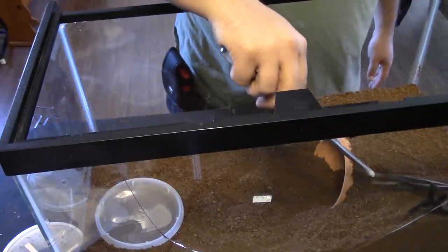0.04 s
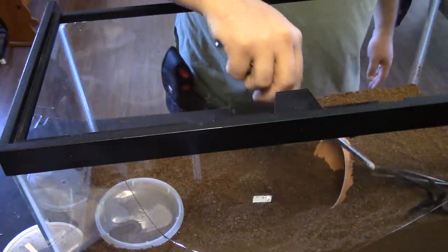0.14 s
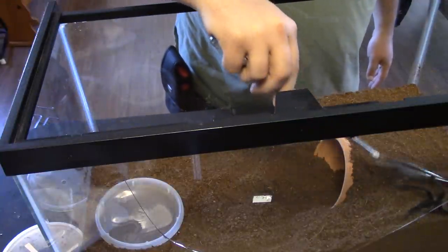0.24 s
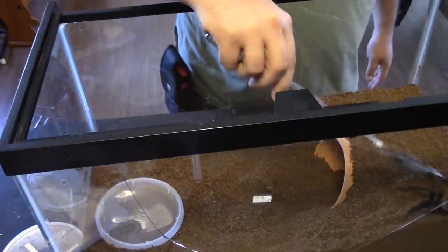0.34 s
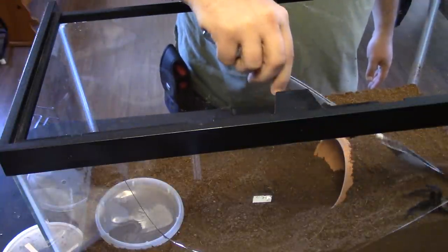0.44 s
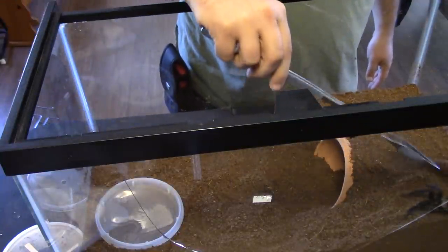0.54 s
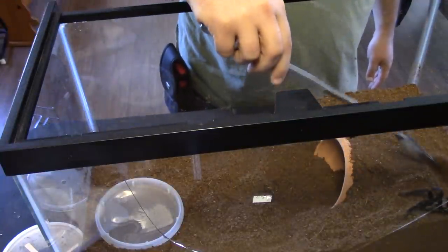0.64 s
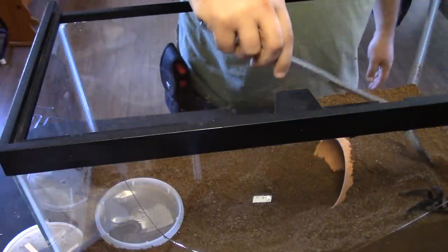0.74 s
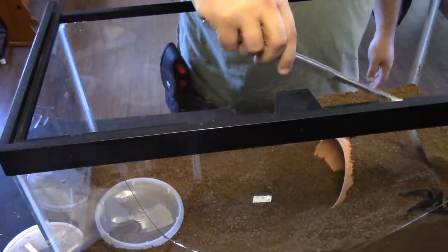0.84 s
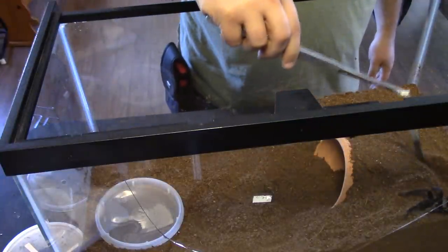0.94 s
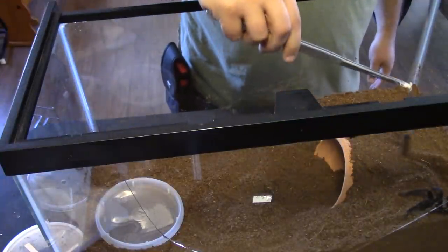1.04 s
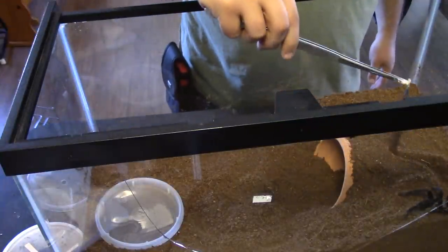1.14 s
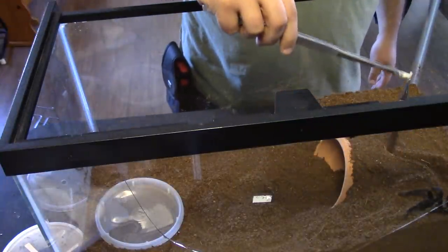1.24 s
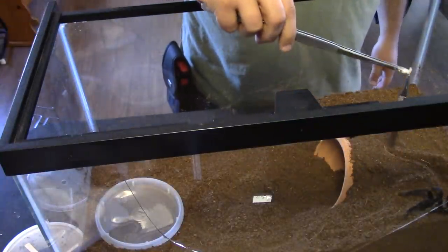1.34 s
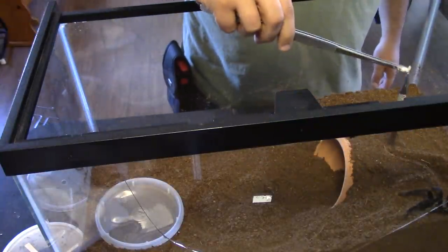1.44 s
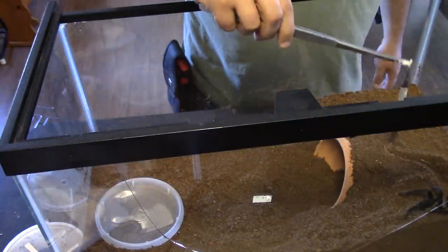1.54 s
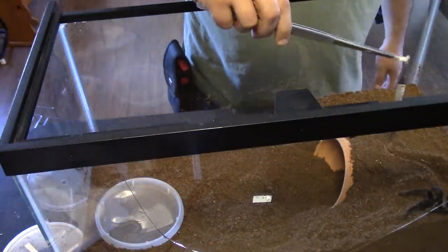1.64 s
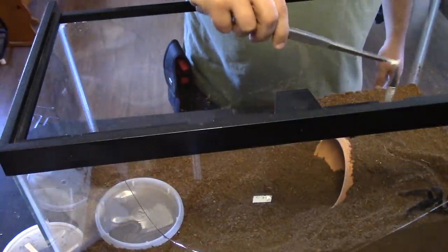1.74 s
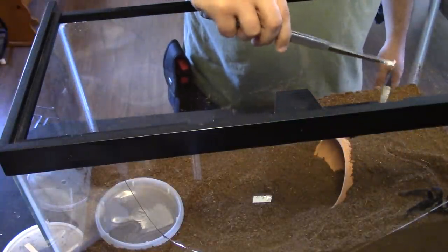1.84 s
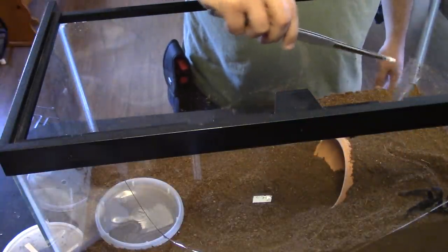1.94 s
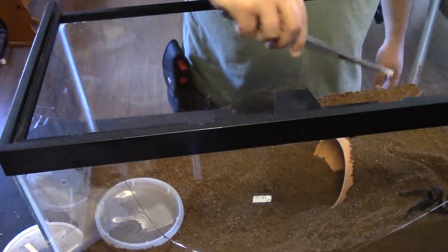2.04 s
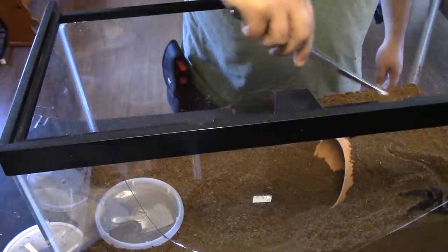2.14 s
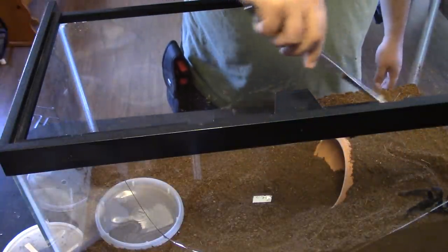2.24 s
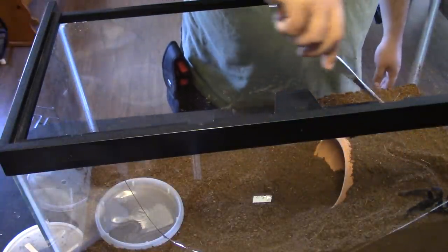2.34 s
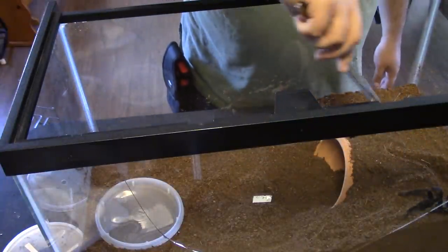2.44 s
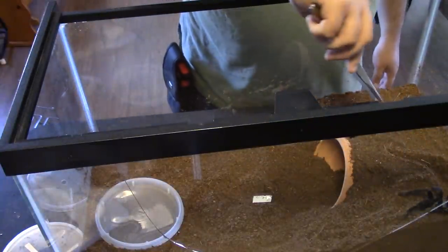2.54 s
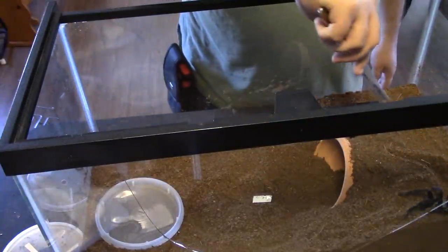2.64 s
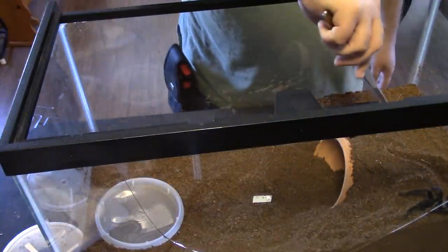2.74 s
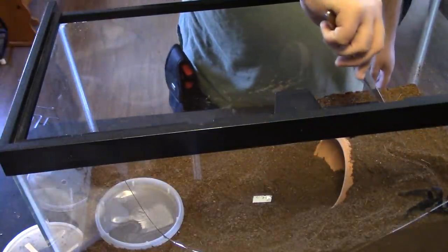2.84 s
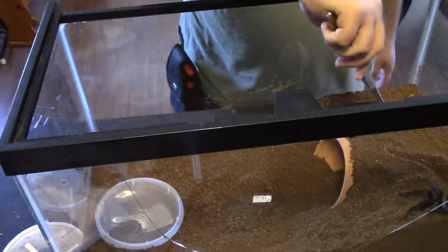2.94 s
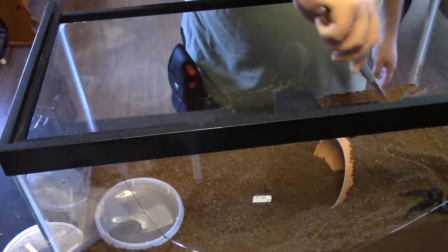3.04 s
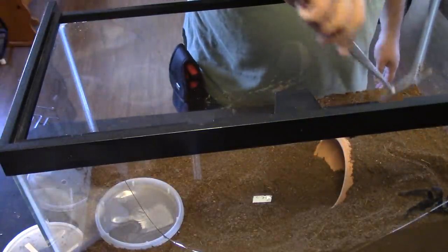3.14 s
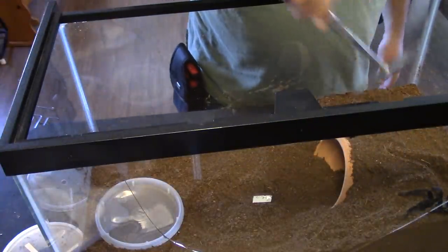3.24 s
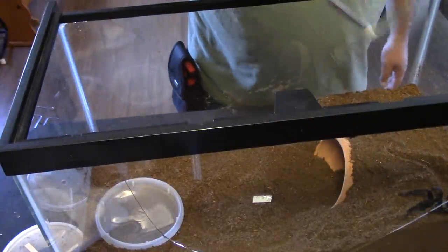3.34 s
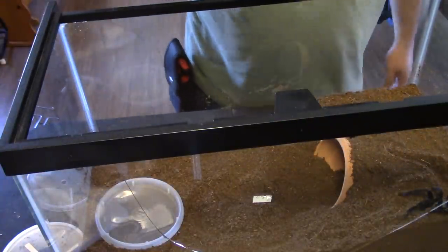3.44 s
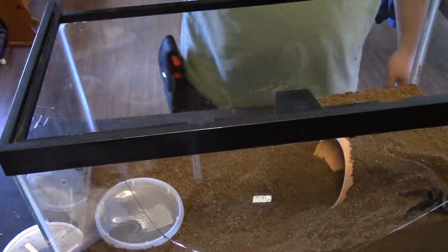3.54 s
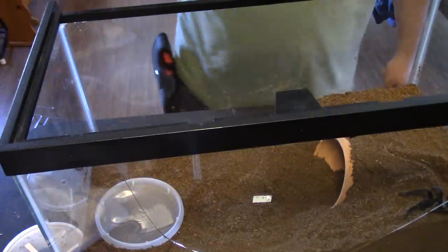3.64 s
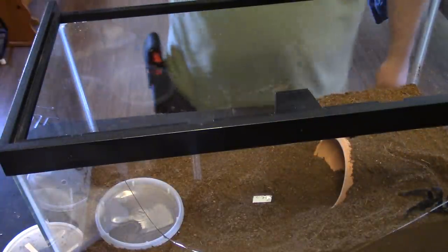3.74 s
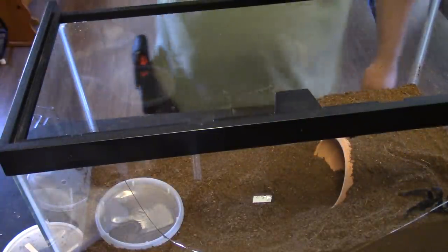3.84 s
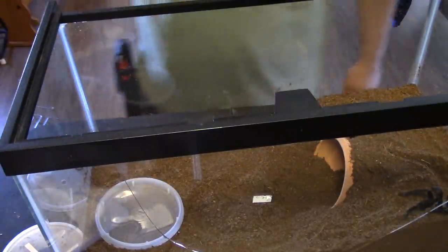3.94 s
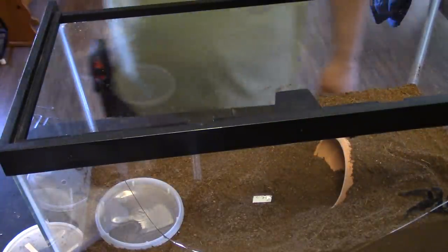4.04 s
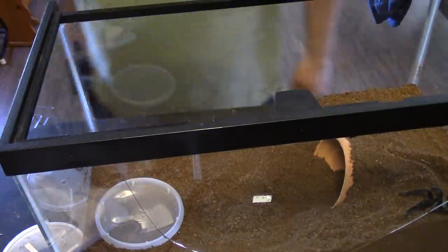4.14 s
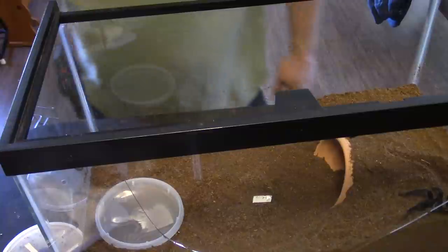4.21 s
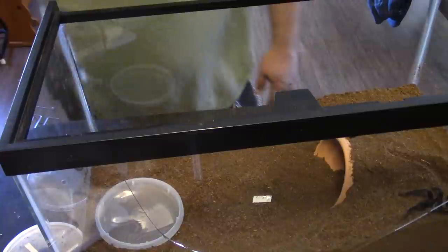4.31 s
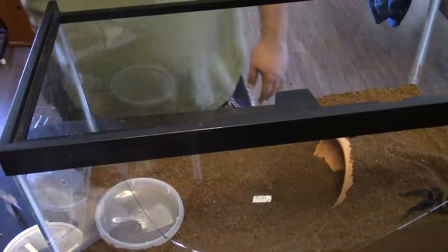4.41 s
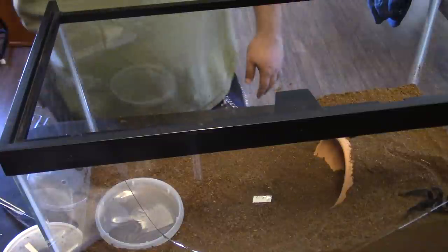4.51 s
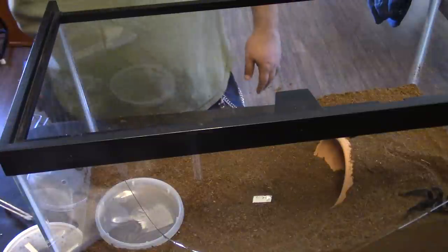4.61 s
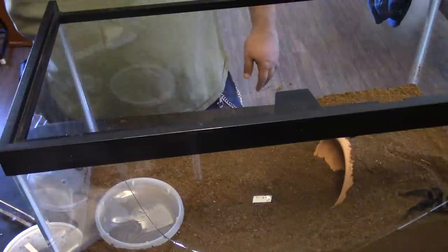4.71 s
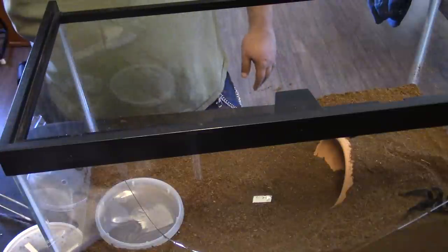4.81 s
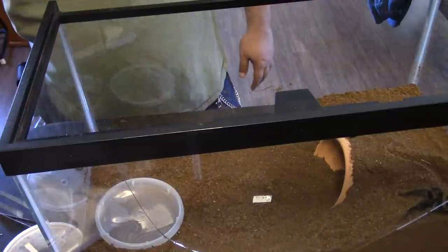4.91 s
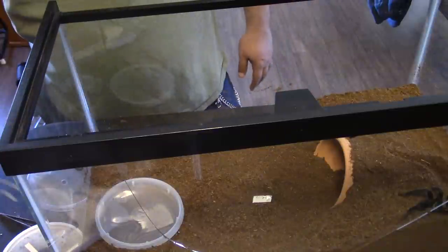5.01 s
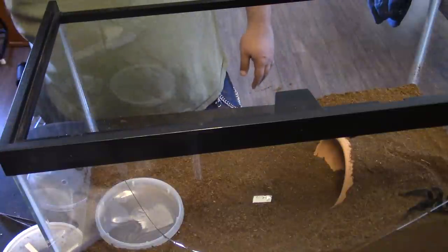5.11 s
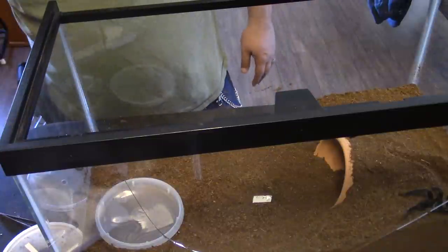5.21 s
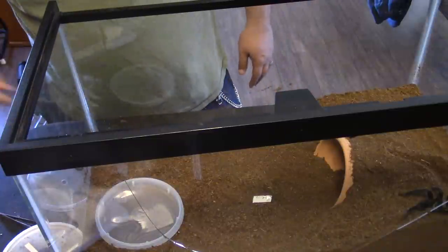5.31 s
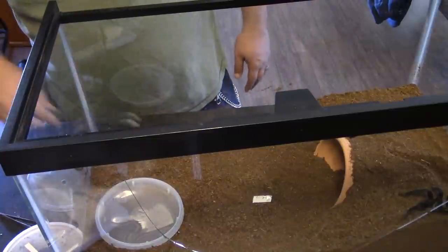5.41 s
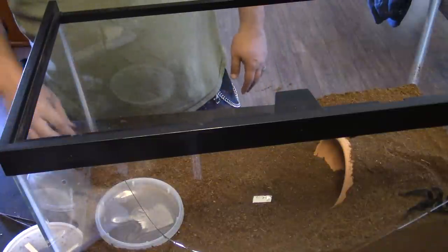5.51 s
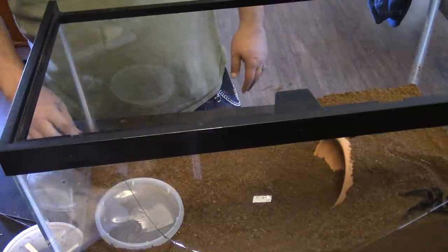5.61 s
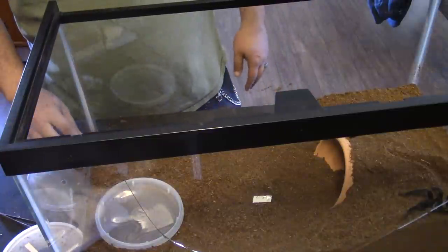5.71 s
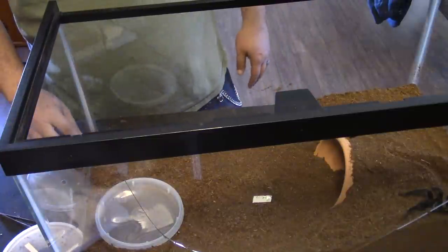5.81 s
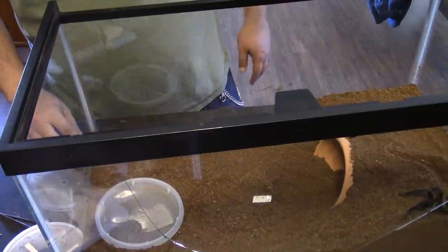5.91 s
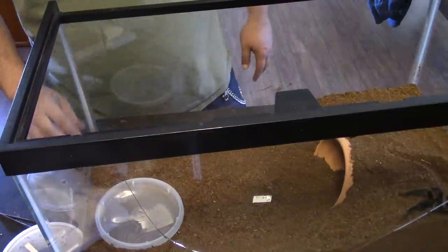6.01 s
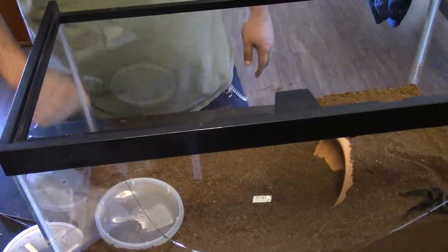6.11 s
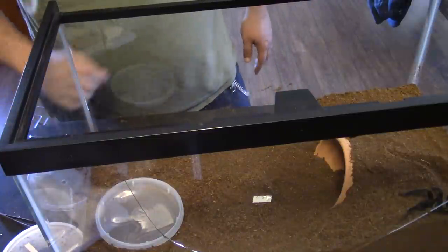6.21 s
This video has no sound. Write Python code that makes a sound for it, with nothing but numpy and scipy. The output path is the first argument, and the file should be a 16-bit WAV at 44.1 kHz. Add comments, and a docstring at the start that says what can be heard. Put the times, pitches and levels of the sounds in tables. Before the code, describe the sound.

Steel tongs snap open and knock loudly on a glass tank, then rattle, clatter on table and shelf, over low fan hiss and motor ticking.

```python
"""Small room: steel tongs are snapped, rattled, pinched, knocked and dragged on tank, frame, rim, table
and shelf; a second metal tool strikes a jar and is laid on a board. Blows excite the struck body's modes,
noise and a modal metal ring. Shaped noise makes fan, hiss, cloth and dragging;
a lens motor ticks, feet and small knocks are short decaying sines."""
import sys
import numpy as np
from scipy import signal
from scipy.fft import rfft, irfft
from scipy.io import wavfile
from scipy.ndimage import uniform_filter1d

SR = 44100
rng = np.random.default_rng(int(sys.argv[2]) if len(sys.argv) > 2 else 0)


def linear_from_db(decibels):
    """Turn decibels (scalar or array-like) into linear amplitude factors; 0 gives 1."""
    return 10 ** (np.asarray(decibels, float) / 20)


def transcribe(signal):
    """Save signal, clipped to [-1, 1], as a 16-bit WAV file at the path in sys.argv[1]."""
    frames = np.atleast_2d(signal).T
    limited = np.clip(frames, -1, 1)
    pcm = np.round(limited * 32767).astype(np.int16)
    wavfile.write(sys.argv[1], SR, pcm)


N = 276154

# fan and microphone hiss: f/Hz, relative density/dB
AIR_COLOUR = [(15, -67), (25, -34.5), (92, -17.5), (120, -7.5), (242, -9.5), (293, -9.5), (394, -6.5),
              (531, -9.5), (1700, -21), (1890, -20.5), (2160, -22.5), (10700, -36), (16000, -45)]
# hiss side signal: f/Hz, level re mid/dB
AIR_SIDE = [(60, -17), (180, -10), (550, -10), (1650, -7), (4970, -7.5), (15000, -10.5)]
# wavering fan tones: f/Hz, width/Hz, rms level/dB
FAN_TONES = [(119.6, 21, -67), (280, 9.2, -78.5), (335.5, 61, -72.5), (404, 5.9, -64.5)]
AIR_DB = -56.5

# lens motor hunts: start t/s, end t/s, initial tick level/dB
LENS_HUNTS = [(0, .33, -57.5), (.42, .77, -55), (1.02, 1.72, -55), (1.9, 2.92, -58.5), (3.15, 4.0, -57)]
LENS_FIRST_S, LENS_TICKS_PER_S = 0.022, 14.985
LENS_IDLE_DB, LENS_SETTLE_DB_PER_S = -61, 2.5

# contacts: t/s, relative blow level/dB at 400 Hz, at 2.5 kHz, at 10 kHz, relative metal ring level/dB
SNAP = [(1.874, -28.5, -22.5, -4.5, -46.5)]
ON_TANK = [(2.014, -10, -2, -21.5, -26.5)]
ON_FRAME = [(2.024, -5, -10.5, -31.5, -35.5)]
TIPS_MEET = [(2.568, -51.5, -38, -64.5, -66), (2.604, -52.5, -62, -55.5, -61),
             (2.612, -47, -49, -55, -50.5), (2.682, -43, -37, -25, -39.5), (2.694, -51, -26.5, -42.5, -36)]
TIPS_PINCH = [(2.817, -55, -43, -39.5, -41), (2.829, -47, -58, -38.5, -40), (2.857, -51, -61, -52, -53),
              (2.885, -48, -62, -45, -62)]
ON_RIM = [(3.009, -27.5, -48, -91, -78), (3.016, -19.5, -54, -65, -64), (3.044, -31.5, -31.5, -28.5, -75),
          (3.051, -25, -29, -32, -73)]
ON_TABLE = [(4.411, -12.5, -12.5, -20.5, -61), (4.426, -17, -51, -42, -80), (4.436, -51, -31.5, -37, -78),
            (4.443, -29, -45, -39.5, -86)]
ON_SHELF = [(4.644, -12.5, -22, -51, -90), (4.655, -25, -34, -42, -85), (4.704, -17.5, -28.5, -30.5, -47),
            (4.723, -19, -23.5, -65, -50), (4.782, -17, -25, -26.5, -41), (4.875, -10.5, -11.5, -27, -79),
            (4.884, -31, -29, -45, -74), (4.894, -20, -16, -32, -60), (4.904, -36, -22, -44, -76),
            (4.912, -36, -33, -41, -76)]
ON_JAR = [(5.521, -53, -53, -54, -82), (5.564, -21, -21, -27.5, -56), (5.753, -37, -43.5, -95.5, -74)]
LAID_DOWN = [(5.797, -16.5, -19.5, -54, -65), (5.813, -18.5, -29, -49, -74), (5.833, -17.5, -13, -40, -62),
             (5.844, -15, -12.5, -32.5, -61), (5.856, -15, -16.5, -42.5, -61), (5.861, -27, -19, -51, -40)]

# short resonances of struck bodies: f/Hz, width before damping/Hz, relative level/dB
HINGE = [(2180, 120, -22), (3140, 110, -13), (4225, 110, -17), (5440, 90, -9), (6790, 130, -12),
         (8215, 110, 2), (9295, 170, -6), (9750, 120, -2), (11500, 150, -11), (11900, 120, -16),
         (12715, 130, -4), (13600, 120, -17)]
TANK = [(185, 65, 5.5), (268, 36, 2), (580, 110, 3), (870, 180, 1), (1600, 300, 3), (2180, 260, -2.5),
        (3370, 240, -25), (4640, 150, -6), (5350, 390, -14.5), (6500, 170, -18), (8530, 230, -27.5),
        (10520, 170, -18), (12000, 157, -11.5), (15030, 150, -18.5)]
FRAME = [(568, 80, -3.5), (872, 80, -16), (1620, 300, 2), (2250, 250, -13.5), (3280, 250, -7.5),
         (3870, 200, -8), (5300, 300, -17.5)]
TIPS = [(3480, 280, -18), (5760, 270, -12.5), (7800, 250, -15), (8640, 200, -11), (9200, 190, -9.5),
        (10090, 300, -12.5), (10820, 190, -13.5), (12020, 150, -15.5), (12270, 200, -3.5),
        (13640, 270, -16), (14960, 240, -24)]
RIM = [(228, 19, 1), (946, 64, 7.5), (1825, 28, -12.5), (2540, 54, -13.5), (3375, 51, -12), (3900, 30, -25),
       (5180, 85, -6.5), (6100, 39, -14), (7500, 47, -13.5), (8180, 72, -10.5), (8850, 55, -15),
       (10780, 69, -16), (12700, 50, -10), (13300, 52, -24.5)]
TABLE = [(236, 21, -13.5), (720, 170, -5), (1435, 240, 0), (2450, 110, -10), (3000, 150, -2),
         (3770, 120, -15), (4600, 400, -5), (7750, 290, 1), (8250, 380, -3.5), (9600, 180, -10),
         (11400, 78, -28), (12900, 84, -27)]
SHELF = [(194, 130, -21), (486, 44, -23.5), (750, 180, -6.5), (920, 260, -13), (1650, 160, -2),
         (2440, 160, -5), (2640, 63, 3.5), (3100, 160, 0.5), (3650, 69, -1.5), (5880, 28, -14),
         (6530, 130, -10.5), (8770, 95, -17.5), (11260, 280, -26)]
JAR = [(196, 23, -13), (522, 96, 1.5), (976, 51, -11), (1470, 62, 6.5), (2000, 45, -31), (2725, 104, 2),
       (3200, 150, -5), (3990, 70, -0.5), (4860, 170, 1), (5220, 110, 2), (6350, 120, -2), (7400, 410, -11)]
BOARD = [(256, 33, -11), (453, 20, -12), (736, 75, -2), (1340, 185, 1), (2057, 70, -7), (2760, 71, -10),
         (3820, 210, -7.5), (4570, 510, -13), (6020, 170, -14), (6470, 250, -8), (8300, 92, -36)]

# tongs modes: f/Hz
TONGS_HZ = [2358, 2832, 3585, 3725, 3867, 4237, 4395, 5474, 5610, 6020, 6175, 6450, 6815, 7655, 7915, 8420,
            8600, 8930, 9230, 9722, 10160, 10320, 10900, 11710, 11850, 12080, 12660, 12840, 13360, 14880]
# tongs modes: t60 before the grip/s
TONGS_T60_S = [.5, 1.5, 0.2, .4, .25, 0.4, 1.0, 0.27, .2, .25, 0.35, .3, 0.3, 0.4, 0.24, 0.3, 0.25, 0.2, .2,
               0.25, .15, .2, .18, 0.19, .16, .15, 0.16, .17, .15, 0.15]
# tongs modes, by kind of contact: relative level/dB
SNAPPED_DB = [-14, -7, -31, -13, -8, -13, -9, 1, -26, -17, -18, -14, -3, -14, -8, -6, -10, -8, -9.5, -10,
              -18, -14, -28.5, -5, -5, -10, -2, -5, -9, -30]
STRUCK_DB = [-36, -38, -31.5, -30, 0, -32, -24, -13, -19, -15, -27, -18, -26.5, -16, -14, -3, -23, -18, -41,
             -38, -35, -3, -41, -12, -12, -27, -11, -15, -11, -5]
RATTLED_DB = [-21, -29, -7.5, -30, -17, -30, -17, -16, -7.5, -5.5, -28.5, -20, -17, -24, -8, -22, -16.5, -5,
              -9.5, -14, -2, -5, -10, -22, -21, -4.5, -19.5, -6, -30, -24]
PINCHED_DB = [-35, -35, -15, -30, -11, -30, -22, -27, -6, -9, -26, -28, -30, -22, -28, -14, -22, -18, -15,
              -30, -28, -24, -11, -28, -22, -24, -22.5, -10, -28, -28]
SLID_DB = [-35, -30, -18, -30, -15, -30, -24, -7, -25, -9, -28, -16, -30, 0, -28, -25, -14, -30, -15, -35,
           -20, -6, -14, -9, -14, -30, -12, -4, -12, -15]
# second tool modes: f/Hz
TOOL_HZ = [3623, 5810, 8533, 9255, 9755, 10900, 11630, 12810, 13250, 15160]
# second tool modes: t60 before the grip/s
TOOL_T60_S = [0.36, 0.46, 0.64, 0.27, .22, 0.37, 0.42, 0.27, 0.28, 0.33]
# second tool modes: relative level/dB
TOOL_DB = [5, -7, -19, -18, -19, -16, -19, -28, -38, -27]

# factors on ring t60, by grip
KEPT_SNAPPED, KEPT_SQUEEZED, KEPT_PRESSED, KEPT_PINCHED, KEPT_LOOSE = 1.3, 0.64, 0.079, 0.44, 0.84
FREE_S, SNAP_FREE_S, HUSH_S = 0.32, 0.16, 0.03   # ring length, two cases; final fade within it
REBOUND_S, TRAVEL_S = 0.015, 0.001   # longest gap to a rebound; delay of blows
SHAKE_SPLIT_HZ, SHAKE_TREBLE_SHARE = 5300, 0.65   # treble shaking t60 re bass t60
# exponent of body resonances in the noise, two cases; floor between resonances
RESONANT_SHARE, JAR_SHARE, VALLEY_DB = 0.3, 0.8, -15

# echo: f/Hz, t60/s
ROOM_T60 = [(150, 0.4), (500, 0.36), (2000, 0.27), (6000, 0.36), (14000, 0.073)]
# echo in mid: f/Hz, level/dB
ROOM_COLOUR = [(150, 1.5), (1000, 0.5), (4000, -6), (12000, -9.5)]
# echo in side: f/Hz, level/dB
ROOM_SIDE = [(150, -26.5), (1000, -23), (4000, -18), (12000, -15.5)]
RING_TO_ROOM_DB = -8   # the ring reaches the walls weaker than the clatter
DIRECT_SIDE_DB, DIRECT_SIDE_HZ = -19, 5000   # direct treble in side
TOP_HZ = 17200

# footfalls: t/s, reference level/dB
STEPS = [(2.691, -44.5), (3.866, -44.5), (3.899, -41.5)]
# arms chatter together: start t/s, end t/s, mean touches per s, relative tick level/dB, relative ring level/dB
CHATTER = [(2.738, 2.774, 330, -35.5, -43), (2.861, 2.899, 340, -55, -85), (4.704, 4.731, 480, -50, -56.5),
           (4.781, 4.819, 340, -38, -51)]
# chatter ticks: f/Hz, added level/dB
CHATTER_COLOUR = [(3000, 0), (8000, 3.5), (12100, 11.5), (12800, 3.5), (15000, 3.5)]
# cloth brushes: peak t/s, peak rms level/dB, rise/s
RUSTLE = [(3.39, -63, .04), (3.52, -60, 0.032), (4.05, -60.5, .6), (4.2, -53, .1), (4.38, -61.5, .15)]
# cloth: f/Hz, relative density/dB
RUSTLE_COLOUR = [(60, -26.5), (300, 6), (1500, 5.5), (4000, -2.5), (9000, -13), (16000, -24)]
RUSTLE_FALL, RUSTLE_EDGE_DB = 1.8, -21.5   # fall time over rise time; level one rise before peak, re peak
# tongs drag: start t/s, end t/s, rms level/dB
SLIDES = [(4.441, 4.514, -48.5), (4.57, 4.649, -58), (4.703, 4.874, -50)]
# drag: f/Hz, relative density/dB
SLIDE_COLOUR = [(800, 0), (2500, 2.5), (6000, -3), (12500, -7.5), (16000, -14.5)]
SLIDE_EDGE_S = 0.0086
# soft knocks near 2 kHz: t/s, reference level/dB
SMALL_KNOCKS = [(6.088, -50.5), (6.187, -45.5)]


def rms_one(x):
    """Scales to an rms of one."""
    return x / np.sqrt(np.mean(x ** 2) + 1e-20)


def at_hz(points, hz):
    """Reads a spectrum on a log-frequency axis."""
    points_hz, values = np.transpose(points)
    return np.interp(np.log(hz), np.log(points_hz), values)


def coloured(spectrum):
    """White noise shaped to a relative spectrum in dB per Hz."""
    hz = np.fft.rfftfreq(N, 1 / SR) + 1
    return irfft(rfft(rng.standard_normal(N)) * linear_from_db(at_hz(spectrum, hz)), N)


def add(out, s, sound):
    """Mixes a sound in at time s."""
    i = int(round(s * SR))
    out[i:i + len(sound)] += sound[:N - i]


def air():
    """Steady hiss and rumble plus narrow-band noise as fan tones; returns mid and side."""
    hz = np.fft.rfftfreq(N, 1 / SR)
    mid = coloured(AIR_COLOUR)
    scale = linear_from_db(AIR_DB) / np.std(mid)
    side = coloured([(f, db + at_hz(AIR_SIDE, f)) for f, db in AIR_COLOUR])
    tones = 0
    for f, width_hz, db in FAN_TONES:
        resonance = 1 / (1 + (2 * (hz - f) / width_hz) ** 2)
        tones = tones + linear_from_db(db) * rms_one(irfft(rfft(rng.standard_normal(N)) * resonance, N))
    return scale * mid + tones, scale * side


def lens_motor():
    """Regular short two-tone ticks, louder while the lens hunts, faint between."""
    out, t = np.zeros(N), np.arange(500) / SR
    tones = np.sin(2 * np.pi * 1870 * t) + 0.35 * np.sin(2 * np.pi * 2080 * t)
    tick = np.hanning(500) * tones
    for s in np.arange(LENS_FIRST_S, N / SR, 1 / LENS_TICKS_PER_S):
        levels_db = [LENS_IDLE_DB]
        for start, end, db in LENS_HUNTS:
            if start <= s + 0.02 < end:
                levels_db.append(db - LENS_SETTLE_DB_PER_S * (s - start))
        add(out, s, tick * linear_from_db(max(levels_db) + 1.5 * rng.standard_normal()))
    return out


def ringing(hz, gain, t60_s, seconds, rise_s=0.00011):
    """Sum of decaying sines, one per mode, in chance phases; the contact takes a moment to build."""
    t = np.arange(int(seconds * SR)) / SR
    phase = 2 * np.pi * (np.outer(hz, t) + rng.random((len(hz), 1)))
    decay = linear_from_db(-60 * np.outer(1 / np.asarray(t60_s), t))
    sound = np.asarray(gain) @ (np.sin(phase) * decay)
    return sound * (1 - np.exp(-t / rise_s))


def metal_ring(hz, t60_s, db, kept, free_s=FREE_S, spread_db=1.5):
    """One touch of a metal tool; the hand scales the modes' t60 and finally stops them."""
    strength = linear_from_db(db + spread_db * rng.standard_normal(len(hz)))
    held_t60_s = np.array(t60_s) * np.clip(kept, 0.05, 2)
    sound = ringing(hz, strength, held_t60_s, seconds=free_s, rise_s=0.00081)
    return sound * np.clip(np.arange(len(sound))[::-1] / (HUSH_S * SR), 0, 1)


def blows(contacts, body, metal, kept, kept_rebound, damping, crack_db, crack_s, shake_db, shake_s,
          top_db, free_s=FREE_S, spread_db=2.0, rise_s=0.00026, share=RESONANT_SHARE):
    """Hardness spectrum weights body modes, a noisy crack and gritty shaking of loose parts; the metal
    rings on as the grip lets it. Returns ring (body and metal) and clatter; crack_s, shake_s are t60s."""
    out = np.zeros((2, N))
    hz, width_hz, db = np.transpose(body)
    t60_s = np.log(1000) / (np.pi * width_hz * damping)
    shape_db = db - uniform_filter1d(db, size=5, mode="nearest")   # about the body's trend
    t, bins_hz = np.arange(8192) / SR, np.fft.rfftfreq(8192, 1 / SR) + 1
    resonances = 1 / (1 + ((bins_hz - hz[:, None]) / width_hz[:, None]) ** 2)
    peaks = linear_from_db(shape_db) @ resonances + linear_from_db(VALLEY_DB)
    rebounds = np.diff(np.array(contacts)[:, 0], prepend=-1) < REBOUND_S
    metal_hz, metal_t60_s, metal_db = metal

    for (s, low_db, mid_db, high_db, ring_db), rebound in zip(contacts, rebounds):
        arrival_s = s + TRAVEL_S
        hardness = [(90, low_db - 24), (230, low_db - 4), (400, low_db), (2500, mid_db),
                    (10000, high_db), (16000, high_db + top_db)]
        gain = linear_from_db(at_hz(hardness, hz) + shape_db - 5.0 + spread_db * rng.standard_normal(len(hz)))
        add(out[0], arrival_s, ringing(hz, gain, t60_s, seconds=0.15, rise_s=rise_s))

        colour = linear_from_db(at_hz(hardness, bins_hz)) * peaks ** share * linear_from_db(3 * share)
        spectrum = rfft(rng.standard_normal(8192)) * colour
        noise = irfft(spectrum)
        bass = irfft(spectrum / (1 + (bins_hz / SHAKE_SPLIT_HZ) ** 2))
        bass_shaking = bass * linear_from_db(-60 * t / shake_s)
        treble_shaking = (noise - bass) * linear_from_db(-60 * t / (shake_s * SHAKE_TREBLE_SHARE))
        grit = linear_from_db(4.8 * rms_one(np.convolve(rng.standard_normal(8192), np.hanning(100), "same")))
        crack = noise * linear_from_db(crack_db - 60 * t / crack_s)
        burst = crack + grit * linear_from_db(shake_db) * (bass_shaking + treble_shaking)
        add(out[1], arrival_s, burst * (1 - np.exp(-t / rise_s)))

        touch_kept = kept_rebound if rebound else kept
        add(out[0], arrival_s, metal_ring(metal_hz, metal_t60_s, np.add(metal_db, ring_db), touch_kept, free_s))
    return out


def contacts():
    """Sums the blows on every body, each with its own damping, crack and shaking."""
    tongs, tool = (TONGS_HZ, TONGS_T60_S), (TOOL_HZ, TOOL_T60_S, TOOL_DB)
    loose = KEPT_LOOSE, KEPT_LOOSE
    hits = blows(SNAP, HINGE, (*tongs, SNAPPED_DB), KEPT_SNAPPED, KEPT_SNAPPED, damping=1.7,
                 crack_db=-6.5, crack_s=0.035, shake_db=-26.5, shake_s=0.2, top_db=-8.0,
                 free_s=SNAP_FREE_S, share=JAR_SHARE)
    hits += blows(ON_TANK, TANK, (*tongs, STRUCK_DB), *loose, damping=0.72,
                  crack_db=-1.0, crack_s=0.022, shake_db=-20.5, shake_s=0.19, top_db=-5.0)
    hits += blows(ON_FRAME, FRAME, (*tongs, STRUCK_DB), *loose, damping=0.65,
                  crack_db=8.0, crack_s=0.011, shake_db=-16.0, shake_s=0.22, top_db=-5.0)
    hits += blows(TIPS_MEET, TIPS, (*tongs, RATTLED_DB), KEPT_SQUEEZED, KEPT_PRESSED, damping=0.93,
                  crack_db=-3.5, crack_s=0.01, shake_db=-30.5, shake_s=0.08, top_db=-0.5)
    hits += blows(TIPS_PINCH, TIPS, (*tongs, PINCHED_DB), KEPT_PINCHED, KEPT_PINCHED, damping=0.87,
                  crack_db=2.5, crack_s=0.0091, shake_db=-30.0, shake_s=0.08, top_db=-3.5)
    hits += blows(ON_RIM, RIM, (*tongs, STRUCK_DB), *loose, damping=2.27,
                  crack_db=-2.5, crack_s=0.03, shake_db=-15.5, shake_s=0.15, top_db=-10.0)
    hits += blows(ON_TABLE, TABLE, (*tongs, SLID_DB), *loose, damping=1.4,
                  crack_db=2.5, crack_s=0.0036, shake_db=-15.0, shake_s=0.31, top_db=-7.5)
    hits += blows(ON_SHELF, SHELF, (*tongs, SLID_DB), *loose, damping=4.4,
                  crack_db=-11.5, crack_s=0.0063, shake_db=-13.5, shake_s=0.19, top_db=-8.5)
    hits += blows(ON_JAR, JAR, tool, *loose, damping=1.0,
                  crack_db=-6.0, crack_s=0.035, shake_db=-13.0, shake_s=0.31, top_db=-21.0, share=JAR_SHARE)
    hits += blows(LAID_DOWN, BOARD, tool, *loose, damping=1.36,
                  crack_db=0.0, crack_s=0.012, shake_db=-9.0, shake_s=0.26, top_db=-12.0)
    return hits


def room(x, colour):
    """Roughly octave-wide noise bands that build up over a few ms and die at the room's rate."""
    t, tail = np.arange(SR // 2) / SR, 0
    for low_hz in 60 * 2. ** np.arange(8):
        high_hz = min(2.18 * low_hz, 0.45 * SR)
        band = signal.butter(2, [low_hz, high_hz], "band", fs=SR, output="sos")
        hz = low_hz * np.sqrt(2)
        t60_s = at_hz(ROOM_T60, hz)
        dying = linear_from_db(-60 * t / t60_s) / np.sqrt(t60_s * SR / 12)
        noise = signal.sosfilt(band, rng.standard_normal(len(t)))
        tail = tail + noise * dying * linear_from_db(at_hz(colour, hz))
    build_up = np.clip((t - 0.003) / 0.0018, 0, 1)
    return signal.fftconvolve(x, tail * build_up)[:N]


def footsteps():
    """Dull footfalls: three low, quickly damped modes."""
    out = np.zeros(N)
    for s, db in STEPS:
        gain = linear_from_db(db + np.array([-6.0, -4.0, -7.0]))
        add(out, s, ringing([150, 185, 235], gain, [0.15, 0.13, 0.1], seconds=0.2, rise_s=0.0019))
    return out


def chatter():
    """Quick, nearly even touches that swell and fade, each a bright tick and a ring of the tongs."""
    out = np.zeros(N)
    hz, width_hz, db = np.transpose(TIPS)
    bright_db = at_hz(CHATTER_COLOUR, hz)
    in_hand, on_shelf = (RATTLED_DB, KEPT_PRESSED), (SLID_DB, KEPT_LOOSE)
    grips = [in_hand, in_hand, on_shelf, on_shelf]
    for (start, end, per_s, tick_db, ring_db), (modes_db, kept) in zip(CHATTER, grips):
        times = start + np.cumsum(1 + 0.18 * rng.standard_normal(24)) / per_s
        for s in times[times < end]:
            progress = np.clip((s - start) / (end - start), 0, 1)
            swell_db = 20 * np.log10(0.47 + np.sin(np.pi * progress ** 0.56))
            touch_db = np.add(modes_db, ring_db + swell_db)
            add(out, s, metal_ring(TONGS_HZ, TONGS_T60_S, touch_db, kept, free_s=0.2))
            gain = linear_from_db(db + bright_db + tick_db + swell_db + 4.4 * rng.standard_normal(len(hz)))
            tick_hz = hz * (1 + 0.012 * rng.standard_normal(len(hz)))
            add(out, s, ringing(tick_hz, gain, 1.9 / width_hz, seconds=0.03, rise_s=0.00026))
    return out


def rustle():
    """Cloth: noise in uneven little clumps; each brush swells and fades."""
    t = np.arange(N) / SR
    clumps = linear_from_db(1.0 * rms_one(uniform_filter1d(rng.standard_normal(N), size=300)))
    power = 0
    for s, db, rise_s in RUSTLE:
        rises_from_peak = np.maximum(s - t, (t - s) / RUSTLE_FALL) / rise_s
        power = power + linear_from_db(db + RUSTLE_EDGE_DB * rises_from_peak) ** 2
    return rms_one(coloured(RUSTLE_COLOUR) * clumps) * np.sqrt(power)


def slide():
    """Steel dragged along: bright, gritty noise for as long as the contact lasts."""
    t = np.arange(N) / SR
    grit = linear_from_db(2.54 * rms_one(uniform_filter1d(rng.standard_normal(N), size=120)))
    pressure = 0
    for start, end, db in SLIDES:
        pressure = pressure + linear_from_db(db) * np.clip(np.minimum(t - start, end - t) / SLIDE_EDGE_S, 0, 1)
    return rms_one(coloured(SLIDE_COLOUR) * grit) * pressure


def small_knocks():
    """Soft knocks on something hollow: two damped modes near 2 kHz."""
    out = np.zeros(N)
    for s, db in SMALL_KNOCKS:
        gain = linear_from_db(db + np.array([3.0, -6.0]))
        add(out, s, ringing([1900, 2250], gain, [0.04, 0.03], seconds=0.1, rise_s=0.00058))
    return out


def scene():
    """All contacts, dry and through the room, over the steady background; returns left and right."""
    # small objects radiate little bass
    high_pass = signal.butter(4, 130, "high", fs=SR, output="sos")
    ring, clatter = signal.sosfilt(high_pass, contacts() + [chatter(), slide()])
    to_room = linear_from_db(RING_TO_ROOM_DB) * ring + clatter
    air_mid, air_side = air()
    mid = ring + clatter + room(to_room, ROOM_COLOUR)
    mid += air_mid + lens_motor() + footsteps() + rustle() + small_knocks()
    direct_treble = signal.lfilter(*signal.butter(1, DIRECT_SIDE_HZ, "high", fs=SR), ring + clatter)
    side = room(to_room, ROOM_SIDE) + linear_from_db(DIRECT_SIDE_DB) * direct_treble + air_side
    return np.array([mid + side, mid - side])


def band_limit(x):
    """A steep low-pass at the top of the band."""
    return signal.sosfilt(signal.butter(12, 16000, fs=SR, output="sos"), x)


def record(dry):
    """The converter clips at full scale and cuts the top."""
    cut = signal.cheby2(14, 70, TOP_HZ, fs=SR, output="sos")
    mix = signal.sosfilt(cut, np.clip(dry, -1, 1))
    return band_limit(mix)


dry = scene()
out = record(dry)
transcribe(out)
```